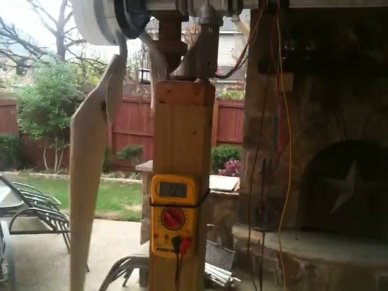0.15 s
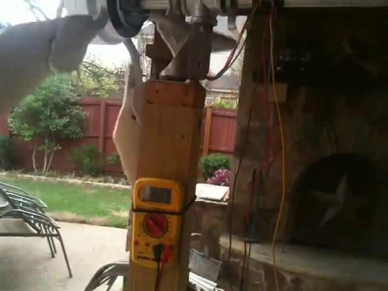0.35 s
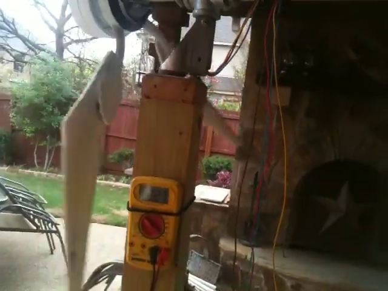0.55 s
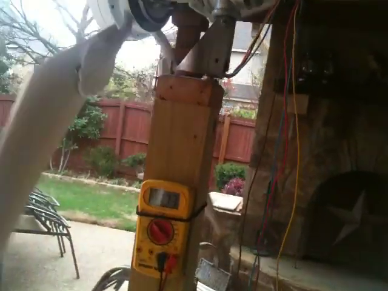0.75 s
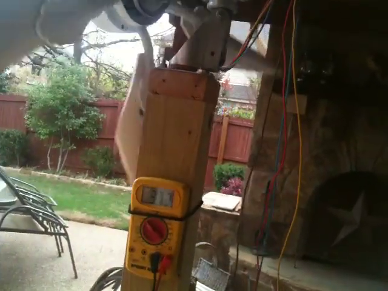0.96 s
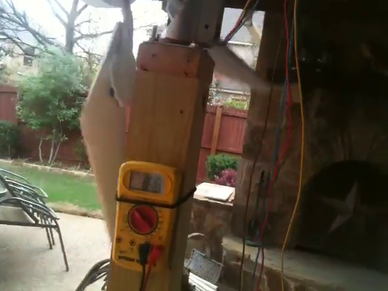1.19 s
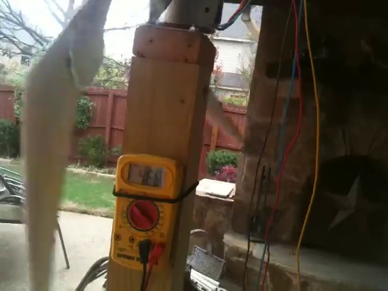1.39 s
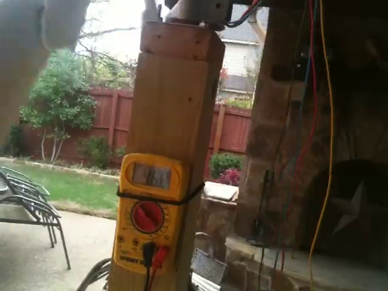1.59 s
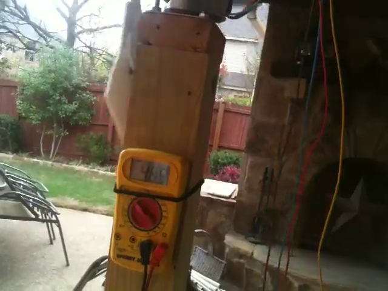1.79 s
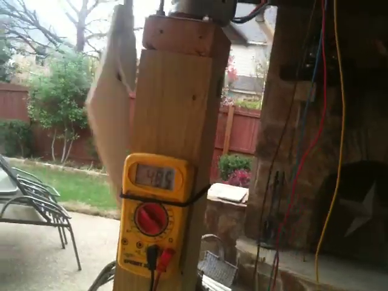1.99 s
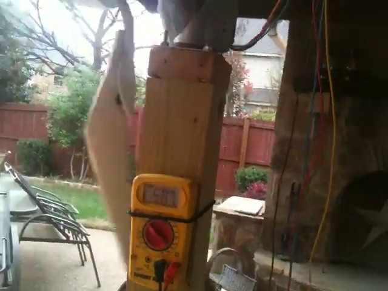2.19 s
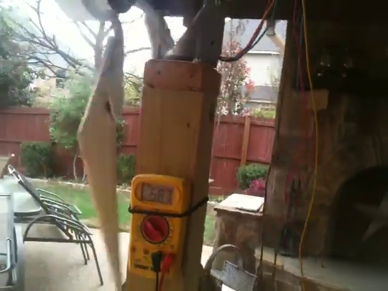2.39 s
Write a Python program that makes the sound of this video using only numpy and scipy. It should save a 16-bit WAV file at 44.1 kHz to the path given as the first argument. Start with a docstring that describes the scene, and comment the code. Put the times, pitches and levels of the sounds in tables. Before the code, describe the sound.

Wind buffeting, low and rumbling, strikes the microphone hard early on, eases, then returns in scattered swells with pops and brief flutters; faint hiss and sparse ticks lie beneath, close and outdoors on a patio.

```python
"""Gusts of moving air buffet a small microphone on a covered patio beside a slowly turning turbine.
From the start, random eddies of filtered impulses thump it in uneven swells, over shaped noise: a low rumble and airy hiss.
The first sharp pop, a trough between two crests, comes within 0.1 s; the hardest fall between 0.24 s and 0.3 s.
Tiny ticks, decaying sines, begin near 0.21 s, and brief flutters, swings that quicken, at 0.3 s; short rustles of
band-passed grains come near 0.4 s, 1.34 s and 1.54 s. Pops and flutters recur until about 1.95 s, sparse ticks until 2.08 s."""
import sys
import numpy as np
from scipy import signal
from scipy.io import wavfile
from scipy.ndimage import uniform_filter1d

SR = 44100
rng = np.random.default_rng(int(sys.argv[2]) if len(sys.argv) > 2 else 0)


def attenuation_scalar(level_db):
    """Turn a level in dB into a linear amplitude multiplier (20 dB per decade)."""
    decades = np.asarray(level_db, float) / 20
    return 10 ** decades


def to_wav(sig):
    """Store sig (one row per channel, or 1-D mono) as 16-bit WAV at the path in sys.argv[1].

    Samples outside -1..1 are clipped; the rate is SR.
    """
    pcm = np.clip(np.atleast_2d(sig), -1, 1) * 32767
    pcm = np.round(pcm).astype(np.int16)
    wavfile.write(sys.argv[1], SR, pcm.T)  # frames by channels


N = 108045

# Strength of the air stream at the microphone, before its bass cut: t/s, level/dB
STREAM_LEVEL = [(0.0, -32), (0.061, -27), (0.18, -29), (0.225, -19.5), (0.247, -20), (0.272, -11.5),
                (0.286, -15.5), (0.31, -19), (0.325, -29.5), (0.339, -39.5), (0.38, -28.5), (0.45, -30.5),
                (0.48, -47.5), (0.59, -40.5), (0.62, -35), (0.7, -54), (0.73, -40.5), (0.782, -22.5),
                (0.799, -33), (0.9, -30), (0.932, -22.5), (0.991, -39.5), (0.998, -32), (1.09, -39.5),
                (1.14, -45), (1.15, -35.5), (1.188, -24.5), (1.25, -23), (1.26, -30), (1.3, -34.5),
                (1.33, -45), (1.42, -41), (1.46, -49), (1.53, -46.5), (1.541, -32.5), (1.56, -35),
                (1.611, -24.5), (1.63, -15.5), (1.638, -13.5), (1.68, -33), (1.73, -27.5), (1.75, -38),
                (1.785, -24), (1.814, -31), (1.845, -21.5), (1.863, -28), (1.9, -23), (1.935, -28),
                (1.958, -23), (2.051, -39.5), (2.071, -31), (2.12, -33.5), (2.15, -60), (2.161, -36),
                (2.22, -27.5), (2.24, -38), (2.35, -39), (2.38, -25.5), (2.45, -28.5)]
# Relative spectrum of one eddy in a weak stream: f/Hz, level/dB
WEAK_EDDY_SPECTRUM = [(15, -72), (25, -76.5), (59, -4.5), (112, -4.5), (151, 0.5), (252, -6.5), (533, -25),
                      (848, -36), (900, -35), (1170, -52), (1980, -120)]
# Relative spectrum of one eddy in a hard stream: f/Hz, level/dB
HARD_EDDY_SPECTRUM = [(15, 7), (25, -10.5), (188, 0), (303, -0.5), (437, -11.5), (1240, -32), (2000, -48.5),
                      (2600, -58), (4400, -120)]
# Stream levels between which the spectrum turns from weak to hard
WEAK_DB, HARD_DB = -30.5, -18
EDDIES_PER_S, EDDY_SPREAD_DB = 1800, 2.5
# Averaging times of the power, and the least share of the stream's power left to random eddies
EVEN_S, SHARE_S, LEAST_SHARE = 0.084, 0.0064, 0.1
MIC_CUT_HZ = 104.6

# Relative spectrum of the steady background, a low rumble under an airy hiss: f/Hz, level/dB
BACKGROUND_SPECTRUM = [(15, -59), (25, -36.5), (155, 1.5), (325, -34.5), (560, -8.5), (642, -17.5),
                       (891, -13), (1110, -14), (1270, -15), (2020, -14.5), (2250, -15), (2800, -20.5),
                       (4580, -19.5), (17000, -38.5)]
# Course of the background: t/s, level/dB, treble lift/dB
BACKGROUND_COURSE = [(0, -49.5, -1.7), (.2, -49.5, 0), (0.329, -50.5, 0), (.55, -50, 1.5), (.75, -50, 0),
                     (.95, -51.5, -1), (1.5, -54, 1.9), (2.45, -54, 1)]
TREBLE_HZ, PATCH_DB = 6000, 1.02

# Single hard eddies, before the bass cut: t of the peak/s, peak level/dB, width/s, push +1 or pull -1
HARD_EDDIES = [(0.0673, -17.5, 0.0018, -1), (0.2403, -9.5, 0.0012, -1), (0.2624, -3.5, 0.0029, -1),
               (0.2679, -18, 0.00058, 1), (0.2724, -6, 0.0011, 1), (0.2767, -3.5, 0.0022, 1),
               (.2990, 0, .0015, 1), (0.3028, -15.5, 0.00048, -1), (0.62, -25.5, 0.0021, -1),
               (0.78, -25.5, 0.00076, -1), (.969, -23.5, 0.0014, -1), (1.098, -26.5, .0015, 1),
               (1.178, -25, 0.0011, 1), (1.2279, -17.5, .0016, -1), (1.540, -26, 0.0028, 1),
               (1.618, -20, 0.00084, 1), (1.6448, -15.5, 0.00082, -1), (1.873, -19, .0015, 1),
               (1.912, -18, 0.0014, 1), (1.947, -16.5, 0.0012, -1)]

# Tiny ticks: t/s, peak level of the envelope/dB, f/Hz, bandwidth/Hz
TICK_RINGS = [(.2135, -49, 14000, 1200), (1.04, -45, 8700, 2020), (1.3445, -39.5, 8650, 1500),
              (1.3475, -46, 8550, 600), (1.3475, -44, 13600, 3000), (1.360, -48, 8950, 1200),
              (2.0778, -44.5, 10100, 3000)]

# Brief flutters, before the bass cut: start t/s, length/s, peak level/dB, f midway/Hz
FLUTTER_SWINGS = [(0.3, 0.021, -8.5, 173.5), (.612, 0.018, -25.5, 166.4), (.916, 0.0213, -19.5, 229),
                  (1.183, 0.022, -13.5, 194.4), (1.233, .016, -17.5, 221), (1.629, 0.018, -8.5, 307.3),
                  (1.821, 0.017, -16, 260), (1.885, 0.015, -13.5, 220)]
QUICKEN = 0.52  # rise of frequency from start to end, as a share of that midway
POINTED = 0.26  # phase lean of each swing in radians, which sharpens its crests

# Short rustles: start t/s, length/s, level at the top of the swell/dB
RUSTLE_SWELLS = [(0.393, 0.062, -66), (1.343, 0.05, -62), (1.543, 0.085, -63)]
RUSTLE_LOW_HZ, RUSTLE_HIGH_HZ, RUSTLE_GRAINS_PER_S = 7440, 15000, 2900


def evened(x):
    """Normalization: scales a signal to rms 1."""
    return x / np.sqrt(np.mean(x ** 2) + 1e-20)


def read(points, hz):
    """Linear interpolation of a spectrum in dB along a logarithmic frequency axis."""
    f, level_db = np.transpose(points)
    return np.interp(np.log(hz + 1), np.log(f + 1), level_db)


def add(mix, s, sound):
    """Superposition: adds a sound to the mix in place from time s."""
    part = mix[max(round(s * SR), 0):][:len(sound)]
    part += sound[:len(part)]


def power(x, seconds):
    """Short-time power: the squared signal under two moving averages."""
    width = int(seconds * SR)
    once = uniform_filter1d(x ** 2, width)
    return abs(uniform_filter1d(once, width)) + 1e-12


def causal(points, size=8192):
    """Minimum phase: log magnitude and phase form a Hilbert pair, giving the most compact causal response."""
    hz = abs(np.fft.fftfreq(size, 1 / SR))
    level_db = np.maximum(read(points, hz), -100)
    log_spectrum = np.conj(signal.hilbert(np.log(attenuation_scalar(level_db))))
    taps = np.fft.ifft(np.exp(log_spectrum)).real[:size // 2]
    return taps / np.linalg.norm(taps)  # unit energy


def buffeting(singles):
    """Shot noise: random eddies of either sign carry the power that single ones leave; harder is brighter."""
    db = np.interp(np.arange(N) / SR, *np.transpose(STREAM_LEVEL))
    when, size, sign = rng.random(N), rng.exponential(1, N), rng.standard_normal(N)
    strength = sign * attenuation_scalar(EDDY_SPREAD_DB * np.minimum(size, 3))
    impulses = (when < EDDIES_PER_S / SR) * strength

    hard = np.clip((db - WEAK_DB) / (HARD_DB - WEAK_DB), 0, 1)
    weak_part = signal.oaconvolve((1 - hard) * impulses, causal(WEAK_EDDY_SPECTRUM))[:N]
    hard_part = signal.oaconvolve(hard * impulses, causal(HARD_EDDY_SPECTRUM))[:N]
    eddies = weak_part + hard_part

    stream_power = attenuation_scalar(db) ** 2
    left = np.maximum(stream_power - power(singles, SHARE_S), LEAST_SHARE * stream_power)
    return eddies * np.sqrt(left / power(eddies, EVEN_S))


def background():
    """Spectral synthesis: random short-time spectra with faint patches; the treble varies on its own."""
    size, hop = 512, 128
    frames, hz = N // hop + 5, np.fft.rfftfreq(size, 1 / SR)
    real, imaginary, patches = rng.standard_normal((frames, len(hz), 3)).T
    patches = uniform_filter1d(patches, 8, axis=0)  # along frequency
    patches = evened(uniform_filter1d(patches, 16, axis=1))  # along time

    s, level_db, lift_db = np.transpose(BACKGROUND_COURSE)
    treble_weight = hz ** 2 / (hz ** 2 + TREBLE_HZ ** 2)
    treble_db = treble_weight[:, None] * np.interp(np.arange(frames) * hop / SR, s, lift_db)
    spectrum_db = read(BACKGROUND_SPECTRUM, hz)[:, None] + treble_db + PATCH_DB * patches
    spectra = (real + 1j * imaginary) * attenuation_scalar(spectrum_db)
    noise = signal.istft(spectra, nperseg=size, noverlap=size - hop)[1][:N]
    return attenuation_scalar(np.interp(np.arange(N) / SR, s, level_db)) * evened(noise)


def pops():
    """Pressure pulse: a short push or pull between two shallower swings the other way."""
    out = np.zeros(N)
    for s, db, width, way in HARD_EDDIES:
        u = np.arange(-6 * width, 6 * width, 1 / SR) / width
        pulse = (1 - 3 * u ** 2) / (1 + u ** 2) ** 3
        add(out, s - 6 * width, attenuation_scalar(db) * way * pulse)
    return out


def ticks():
    """Damped resonance: tiny rings whose decay is quicker the wider their band."""
    out, t = np.zeros(N), np.arange(300) / SR
    for s, db, hz, width_hz in TICK_RINGS:
        u = np.pi * width_hz * t
        envelope = u * np.exp(1 - u)  # peaks at 1
        add(out, s, attenuation_scalar(db) * envelope * np.sin(2 * np.pi * hz * t))
    return out


def flutters():
    """Frequency sweep: a few quickening swings, with crests sharpened by phase, under a soft swell."""
    out = np.zeros(N)
    for s, length, db, hz in FLUTTER_SWINGS:
        u = np.linspace(0, 1, int(length * SR))
        sweep_hz = hz * (1 + QUICKEN * (u - 0.5))
        turns = np.cumsum(sweep_hz) / SR + rng.random()
        phase = 2 * np.pi * turns
        swing = np.sin(phase + POINTED * np.sin(phase))
        add(out, s, attenuation_scalar(db) * np.sin(np.pi * u) ** 2 * swing)
    return out


def rustles():
    """Granular noise: dense thin impulses through a band-pass, under a soft swell."""
    grains = (rng.random(N) < RUSTLE_GRAINS_PER_S / SR) * rng.standard_normal(N)
    band = signal.butter(3, [RUSTLE_LOW_HZ, RUSTLE_HIGH_HZ], "band", fs=SR, output="sos")
    grains = evened(signal.sosfilt(band, grains))
    swell = np.zeros(N)
    for s, length, db in RUSTLE_SWELLS:
        u = np.linspace(0, 1, int(length * SR))
        add(swell, s, attenuation_scalar(db) * np.sin(np.pi * u ** 0.51))
    return swell * grains


def scene():
    """High-pass response: the microphone's bass cut turns pushes into swings; the rest arrives as it is."""
    cut = signal.butter(4, MIC_CUT_HZ, "high", fs=SR, output="sos")
    hard, fluttering = pops(), flutters()
    stream = buffeting(hard + fluttering) + fluttering
    # filtering the pops both ways in time keeps their peaks in place
    wind = signal.sosfilt(cut, stream) + signal.sosfiltfilt(cut, hard)
    return (wind + background() + ticks() + rustles())[None]


def band_limit(x):
    """A steep low-pass at the top of the band."""
    return signal.sosfilt(signal.butter(12, 17100, fs=SR, output="sos"), x)


def record(dry):
    """Unity gain: the finished mix is passed on at its own level."""
    return band_limit(dry)


dry = scene()
out = record(dry)
to_wav(out)
```